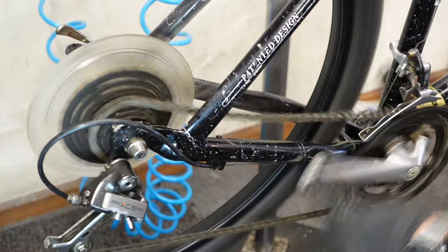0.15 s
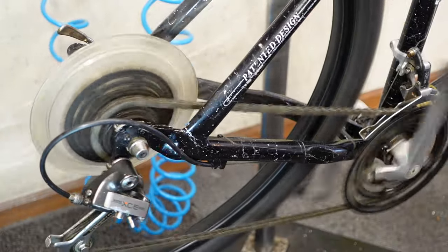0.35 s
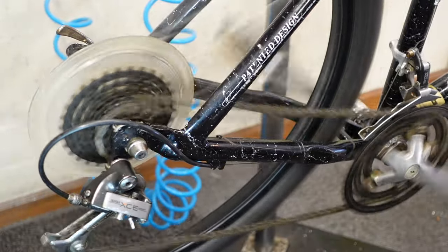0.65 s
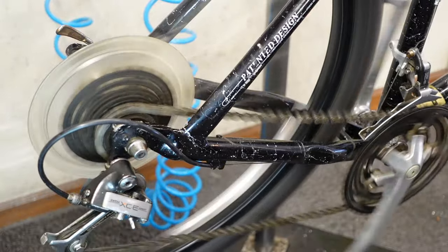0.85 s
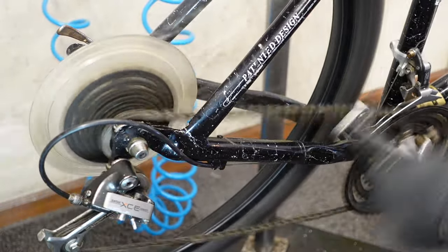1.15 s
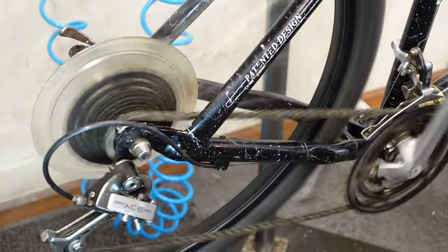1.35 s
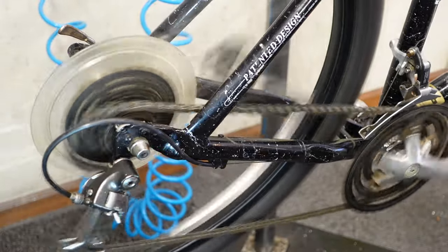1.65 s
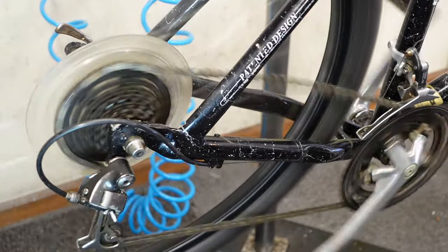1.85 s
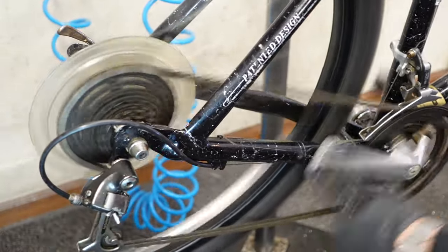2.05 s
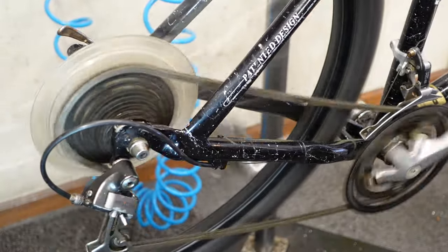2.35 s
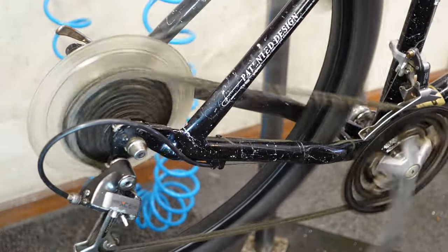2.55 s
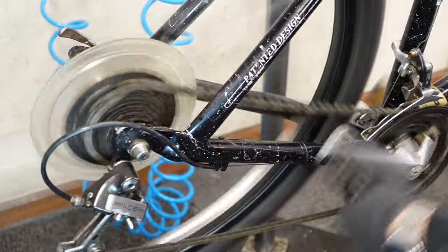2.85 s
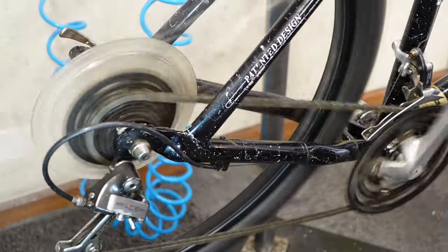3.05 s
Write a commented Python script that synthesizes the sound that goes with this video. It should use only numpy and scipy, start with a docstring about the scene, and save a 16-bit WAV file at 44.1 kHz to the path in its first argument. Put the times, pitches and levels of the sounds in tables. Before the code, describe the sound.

Bicycle gears shifting with sharp metal clanks and ticks over a low wheel rumble.

```python
"""A low rumble and a faint patter, then sharp steel snaps: a bicycle is pedalled by hand on a repair
stand in a small workshop while the rear gears are shifted. The chain snaps over the sprocket teeth,
drops onto new cogs with clanks that shake the frame, then ticks against the next cog. Each impact is
a short noise burst shaped by the resonances of the struck parts, and sets the cogs ringing.
Underneath, the rollers patter, loose links rattle and the wheel rumbles."""
import sys
import numpy as np
from scipy import signal
from scipy.fft import rfft, irfft
from scipy.io import wavfile
from scipy.ndimage import uniform_filter1d

SR = 44100
rng = np.random.default_rng(int(sys.argv[2]) if len(sys.argv) > 2 else 0)


def file_out(sig):
    """Save sig as 16-bit WAV at sys.argv[1]."""
    # one column per channel
    cols = np.atleast_2d(sig).T
    # limit, then scale
    lim = np.clip(cols, -1, 1)
    pcm = np.round(lim * 32767).astype(np.int16)
    wavfile.write(sys.argv[1], SR, pcm)


N = 141120
TIME = np.arange(N) / SR
CUTOFF_HZ = 16000


def from_db(db):
    """Amplitude ratio of a level in decibels."""
    return 10 ** (np.asarray(db) / 20)


def rms_one(x):
    """Normalisation to unit rms."""
    return x / np.sqrt(np.mean(x ** 2) + 1e-20)


def envelope(curve):
    """Gain over time, interpolated between (t/s, level/dB) points."""
    return from_db(np.interp(TIME, *np.transpose(curve)))


def fluctuation(samples):
    """Low-pass noise of unit rms: a moving average of white noise."""
    return rms_one(uniform_filter1d(rng.standard_normal(N), size=samples))


def at_hz(points, hz, axis=1):
    """Interpolation of a table column over log frequency."""
    table = np.array(points)
    return np.interp(np.log(hz + 1e-3), np.log(table[:, 0]), table[:, axis])


def colour(x, spectrum):
    """Minimum-phase filtering at unit power gain; folding the cepstrum makes it causal."""
    size = 2 * N
    gain = rms_one(from_db(at_hz(spectrum, np.arange(N + 1) * SR / size)))
    cepstrum = irfft(np.log(gain))
    cepstrum[1:N] *= 2
    cepstrum[N + 1:] = 0
    return irfft(rfft(x, size) * np.exp(rfft(cepstrum)))[:N]


def resonate(x, modes):
    """Modal superposition: damped two-pole resonators driven by x, summed with alternating signs."""
    out = 0
    for k, (hz, db, t60) in enumerate(modes):
        radius, angle = from_db(-60 / (t60 * SR)), 2 * np.pi * hz / SR
        feedback = [1, -2 * radius * np.cos(angle), radius ** 2]
        out += (-1) ** k * from_db(db) * signal.lfilter([0, np.sin(angle)], feedback, x + 1e-18)
    return out


def driven_mode(s, db, hz, rise_ms, decay_ms):
    """Forced, then free vibration: a mode builds up under the chain's chatter until s, then decays."""
    ms = (TIME - s) * 1000
    shape = np.exp(np.maximum(np.minimum(ms / rise_ms, -ms / decay_ms), -20))
    return from_db(db) * shape * np.sin(2 * np.pi * hz * (TIME - s))


def contact(s, db, rise_ms, decay_ms):
    """Impact noise: dense steel chatter that grows exponentially until s, then decays."""
    ms = (TIME - s) * 1000
    near = (ms > -6 * rise_ms) & (ms < 8 * decay_ms)
    shape = np.exp(np.minimum(ms[near] / rise_ms, -ms[near] / decay_ms))
    chatter = rng.standard_normal(N)[near] * shape
    out = np.zeros(N)
    out[near] = from_db(db) * rms_one(chatter) * np.sqrt(np.mean(shape ** 2))
    return out


SLIDE_LEAD_S, LINK_BANDWIDTH_HZ = 0.000857, 710
def link_click(s, db, decay_ms, hz):
    """Damped resonance: a faint slide on the tooth, then a hard hit, excite a link's broad mode."""
    hit = contact(s + SLIDE_LEAD_S, db, rise_ms=0.26, decay_ms=max(decay_ms, 0.5))
    hit += contact(s, db - 12.5, rise_ms=1.45, decay_ms=1.45)  # the slide
    hz = min(hz, CUTOFF_HZ)
    link_mode = signal.iirpeak(hz, hz / LINK_BANDWIDTH_HZ, fs=SR)
    return hit + from_db(-0.5) * signal.lfilter(*link_mode, hit + 1e-18)


# reverberation of the workshop: f/Hz, T60/s, level/dB
ROOM_DECAY = [(153, 0.82, -9.5), (487, 0.96, 0), (2100, 0.23, -8.5), (5430, 0.11, -2.5), (9100, 0.11, -7.5),
              (15000, 0.083, -5.5)]
def workshop(x, gap_s=0.0013, build_s=0.0007):
    """Diffuse reverberation: the reflections decay exponentially in each band, faster in the treble."""
    t = TIME[:SR // 2]
    edges = np.geomspace(80, 18000, 12)
    white, tail = rng.standard_normal((2, len(t))), 0
    build = 1 - np.exp(-np.maximum(t - gap_s, 0) / build_s)
    for k, band in enumerate(zip(edges, edges[1:])):
        hz = np.sqrt(band[0] * band[1])
        fade = build * from_db(-60 * t / at_hz(ROOM_DECAY, hz))
        noise = signal.sosfilt(signal.butter(2, band, "band", fs=SR, output="sos"), white[k % 2])
        tail += from_db(at_hz(ROOM_DECAY, hz, axis=2)) * noise * fade / np.sqrt(np.sum(fade ** 2))
    return signal.fftconvolve(x, tail)[:N]


# envelope of the running wheel and drive: t/s, level/dB
RUMBLE_LEVEL = [(0, -31), (0.06, -40), (0.35, -41), (0.7, -37), (1.1, -44.5), (1.42, -43.5), (1.85, -31),
                (2.0, -39.5), (2.55, -36), (2.9, -41), (3.2, -47)]
# their spectrum: f/Hz, level/dB
RUMBLE_SPECTRUM = [(20, -21), (35, -15.5), (60, -5.5), (100, -6), (170, -3.5), (300, 2.5), (500, 5),
                   (750, -9), (1200, -5.5), (2500, -16), (6000, -31), (15000, -61)]
def wheel_rumble(flutter_db=0.7):
    """Amplitude-modulated noise: the wheel and drive run with a low, uneven rumble."""
    flutter = from_db(flutter_db * fluctuation(2000))
    return envelope(RUMBLE_LEVEL) * flutter * colour(rng.standard_normal(N), RUMBLE_SPECTRUM)


# modes of a roller seating on a tooth: f/Hz, level/dB, T60/s
SEATING_MODES = [(6560, 2.5, 0.0053), (7100, -7, 0.007), (8270, -0.5, 0.0032)]
# single rollers that seat hard: t/s, level/dB
HARD_SEATINGS = [(0.5263, -18), (0.561, -19.5), (0.6041, -21.5), (0.6392, -21.5), (1.0183, -22.5)]
def rollers(count=170, per_s=49, mean_db=-36, spread_db=4.5):
    """Impulse excitation: the rollers seat in an uneven train, each with a faint high tick."""
    jitter, strength = np.clip(rng.standard_normal((count, 2)), -2, 2).T
    beats = (np.arange(count) + 0.3 * jitter) / per_s
    inside = (beats > 0) & (beats < TIME[-1])
    train = np.zeros(N)
    train[(beats[inside] * SR).astype(int)] = from_db(mean_db + spread_db * strength[inside])
    for s, db in HARD_SEATINGS:
        train[int(s * SR)] = from_db(db)
    return resonate(train, SEATING_MODES)


# envelope of the chain's continuous rattle: t/s, level/dB
RATTLE_LEVEL = [(0, -37.5), (0.15, -44.5), (0.26, -27.5), (0.44, -38.5), (0.72, -43.5), (0.79, -22),
                (0.96, -37), (1.1, -43.5), (1.28, -40), (1.47, -45), (1.49, -31), (1.6, -24.5),
                (1.83, -24.5), (1.99, -36), (2.12, -29.5), (2.62, -34), (2.82, -39), (3.2, -42)]
# its spectrum: f/Hz, level/dB
RATTLE_SPECTRUM = [(150, -5.5), (900, -3.5), (1700, 0), (2700, 3), (4300, -4.5), (7000, -3), (10000, -7),
                   (13500, -12.5), (16000, -23)]
def link_rattle(per_s=350, spread_db=1.5, decay_ms=1.57):
    """Incoherent summation: loose links jostle in tiny random scrapes whose powers add."""
    sizes = from_db(spread_db * np.minimum(rng.exponential(1, N), 4))
    touches = sizes ** 2 * (rng.random(N) < per_s / SR)
    retained = np.exp(-2000 / (decay_ms * SR))  # power decays twice as fast as amplitude
    power = signal.lfilter([1], [1, -retained], touches + 1e-18)
    scrapes = np.sqrt(power) * rng.standard_normal(N)
    return envelope(RATTLE_LEVEL) * rms_one(colour(scrapes, RATTLE_SPECTRUM))


# modes of the sprocket cluster: f/Hz, level/dB, T60/s
SPROCKET_MODES = [(544.3, -55, 0.88), (1632, -51, 0.41), (2120, -60, 0.59), (2520, -63, 0.25),
                  (5560, -57, .3)]
def sprocket_ring(chain):
    """Resonance: the lightly damped cogs ring on after the chain's contacts."""
    return resonate(chain, SPROCKET_MODES)


# envelope of a struck steel part: t/s, rise/ms, decay/ms
STEEL_ENVELOPE = (0.272, 16, 12)
# its modes: f/Hz, level/dB
STEEL_PARTIALS = [(4790, -29), (7390, -19), (10400, -31), (11850, -33)]
def steel_ring():
    """Inharmonic modes: a thin, high ring follows the opening clanks."""
    s, rise, decay = STEEL_ENVELOPE
    return sum(driven_mode(s, db, hz, rise, decay) for hz, db in STEEL_PARTIALS)


# brief pitched chain sounds: t/s, f/Hz, level/dB, Gaussian width/s
CHAIN_TONES = [(0.338, 2910, -20, 0.0052), (1.763, 2900, -14, 0.0031), (2.056, 2700, -13.5, 0.0026),
               (2.881, 2490, -17.5, 0.0018)]
def chain_tones(waver_hz=68):
    """Frequency-modulated tone bursts: three link squeaks, then one short cog ping."""
    out = 0
    for s, hz, db, width in CHAIN_TONES:
        phase = 2 * np.pi * np.cumsum(hz + waver_hz * fluctuation(60)) / SR
        swell = np.exp(-0.5 * ((TIME - s) / width) ** 2)
        out += from_db(db) * swell * np.sin(phase)
    return out


# side plates touching the neighbouring cog: t/s, relative level/dB
PLATE_TICKS = [(2.0287, -6), (2.0996, -10.5), (2.1089, -8), (2.1275, -12.5), (2.147, -11), (2.1637, -10),
               (2.1868, -13.5), (2.2202, -7.5), (2.2369, -12.5), (2.2957, -16.5), (2.3226, -4.5),
               (2.3381, -8.5), (2.389, -7.5), (2.4286, -7), (2.444, -7), (2.463, -8.5), (2.4725, -10),
               (2.5037, -3), (2.5068, -7), (2.5366, -13), (2.5493, -4.5), (2.563, -4.5), (2.5974, -4.5),
               (2.6394, -10.5), (2.6837, -1), (2.716, -8), (2.7623, -12.5), (2.926, -8.5), (2.9442, -14.5),
               (2.963, -17.5), (3.0015, -18.5), (3.02, -8), (3.098, -14), (3.1914, -9.5)]
# their spectrum: f/Hz, level/dB
TICK_SPECTRUM = [(150, -14), (700, -13.5), (1100, -3), (1900, -9.5), (2400, -5), (3100, -4), (4500, -3),
                 (6300, -5), (9500, -4), (13500, -11), (16000, -28)]
def plate_ticks(typical_decay_ms=2.94, typical_hz=7080, gain_db=-7.5):
    """Light impacts: each plate meets the cog with its own decay time and resonant frequency."""
    variation = 2 ** rng.uniform(-0.35, 0.51, (len(PLATE_TICKS), 2))
    clicks = sum(link_click(s, db, typical_decay_ms * longer, typical_hz * higher)
                 for (s, db), (longer, higher) in zip(PLATE_TICKS, variation))
    return from_db(gain_db) * colour(clicks, TICK_SPECTRUM)


# modes of the rubbed cog: f/Hz, level/dB, T60/s
PING_MODES = [(2260, -12.5, 0.017), (2557, -12.5, 0.017), (2730, -20, 0.013)]
def cog_pings(grazes_per_s=30, graze_db=7, strength_exponent=0.63):
    """Impulse response: each tick, and light grazes from the first tick on, ping the cog's modes."""
    s, db = np.transpose(PLATE_TICKS)
    grazed = (rng.random(N) < grazes_per_s / SR) & (TIME > s[0])
    strikes = grazed * from_db(graze_db) * envelope(RATTLE_LEVEL)
    strikes[((s + SLIDE_LEAD_S) * SR).astype(int)] = from_db(db)
    return resonate(strikes ** strength_exponent, PING_MODES)


# pitched knocks of the frame: t/s, level/dB, f/Hz, decay/ms
FRAME_KNOCKS = [(0.236, -25.5, 148, 21), (1.26, -16, 407, 29), (1.337, -16, 415, 11), (1.801, -12, 215, 11),
                (1.836, -18.5, 398, 10), (1.876, -14, 935, 12), (2.645, -29, 224, 8.2)]
def frame_knocks(rise_ms=4):
    """Selective excitation: a hard drop of the chain singles out one mode of the frame."""
    return sum(driven_mode(s, db, hz, rise_ms, decay) for s, db, hz, decay in FRAME_KNOCKS)


# the chain seating on a cog: t/s, clank level/dB, thud level/dB, rise/ms, decay/ms
DROPS = [(0.193, -17.5, -19.5, 3.4, 11), (0.234, -8.5, -21.5, 3.6, 11.4), (0.313, -27, -22.5, 4.5, 24),
         (0.335, -10, -27, 1.8, 2.8), (0.374, -19, -25, 6.3, 4.1), (0.53, -26.5, -32, 1.8, 21.5),
         (0.764, -11, -14.5, 5, 6.5), (0.802, -19, -17.5, 3.6, 12.4), (0.839, -15, -24.5, 9.1, 7),
         (1.005, -38, -30, 4.6, 23), (1.132, -24.5, -18, 2.8, 7.7), (1.215, -23.5, -24.5, 9.3, 5.5),
         (1.252, -12.5, -14, 8.2, 16.5), (1.279, -18, -22, 9.7, 21), (1.337, -17.5, -18.5, 7.5, 9.3),
         (1.72, -27, -23.5, 9.8, 9.6), (1.761, -19, -25.5, 1.7, 28), (1.797, -39, -13.5, 12.4, 11.6),
         (1.817, -9.5, -24, 12, 8.7), (1.875, -15, -14.5, 3.2, 13.7), (1.936, -22, -43, 2.3, 6.7),
         (2.051, -15.5, -23.5, 3, 9.2), (2.204, -20.5, -19, 1.5, 11.4), (2.511, -21, -25, 1.9, 9.9),
         (2.690, -12.5, -23.5, 1.8, 4.3), (2.807, -74, -28, 3.8, 7.5)]
# spectra of the cogs' clank and the frame's thud: f/Hz, level/dB
CLANK_SPECTRUM = [(200, -38), (900, -16), (1500, -12.5), (2100, 1.5), (2900, 0), (3900, -9), (6000, -15),
                  (9500, -15.5), (13500, -27), (16000, -39)]
THUD_SPECTRUM = [(30, -33), (100, -15.5), (155, -4.5), (215, -0.5), (300, -4.5), (405, 0), (560, -1),
                 (720, -4), (930, -2), (1500, -7), (3000, -39), (12000, -47)]
def chain_drops(clatter_db=3):
    """Structure-borne sound: each drop clanks in the cogs, link by link, and thuds through the frame."""
    clank = sum(contact(s, db, rise, decay) for s, db, _, rise, decay in DROPS)
    thud = sum(contact(s, db, rise, decay) for s, _, db, rise, decay in DROPS)
    clatter = rms_one(from_db(clatter_db * np.clip(fluctuation(80), -2, 2)))
    return colour(clank * clatter, CLANK_SPECTRUM), colour(thud, THUD_SPECTRUM)


# links leaving the tooth tips: t/s, relative level/dB, decay/ms, link resonance f/Hz
LINK_SNAPS = [(0.1888, -4.5, 2, 6800), (0.2263, -4.5, 1.6, 8800), (0.2564, -8.5, 2.9, 7350),
              (0.2904, -9.5, 3.4, 9800), (0.303, -14.5, 2.7, 9300), (0.359, -11, 3.7, 10100),
              (0.3725, -2.5, 2.1, 10100), (0.4838, -1.5, 1, 8400), (0.75, -14.5, 5.6, 6840),
              (0.7594, -5.5, 3, 8500), (0.7758, -3.5, 3.5, 9900), (0.7967, -2, 2.3, 8700),
              (0.8229, -5.5, 2.3, 2500), (0.854, -10, 2.6, 2960), (0.8806, -4.5, 2.7, 11100),
              (0.9025, -9.5, 1.8, 5900), (0.9778, -18, 2.1, 3020), (1.1249, -12, 4, 6400),
              (1.168, -13, 2.9, 5500), (1.481, 0, 1.6, 9500), (1.5455, -0.5, 1.34, 6000),
              (1.5793, -1, 1.7, 7700), (1.6167, -1, 1.4, 7900), (1.6536, -1, 1.34, 3400),
              (1.6841, -7, 0.55, 7940), (1.6979, 2.5, 0.47, 7550), (1.7827, -7, 5, 8540),
              (1.7964, -6.5, 4.9, 6640), (1.935, -5, 2.7, 11900), (2.061, -5, 3.7, 10100),
              (2.2017, -3.5, 2.9, 1410), (2.4013, -1.5, 1, 6460), (2.5851, -4.5, 2.8, 3670),
              (2.8791, -11.5, 1.7, 2500)]
# their spectrum: f/Hz, level/dB
SNAP_SPECTRUM = [(150, -20.5), (600, -2), (1300, -11.5), (1800, 2.5), (2400, -2), (3400, 2.5), (4800, -2.5),
                 (8200, 0), (10500, -3), (13500, -6.5), (16000, -28)]
def chain_snaps(gain_db=-4.5):
    """Transient excitation: links snap off the teeth so briefly that the sound is broadband."""
    clicks = sum(link_click(*snap) for snap in LINK_SNAPS)
    return from_db(gain_db) * colour(clicks, SNAP_SPECTRUM)


def scene():
    """Superposition: chain contacts, each group with its own reflections, plus ringing and rumble."""
    parts = [chain_snaps(), plate_ticks() + cog_pings(), *chain_drops(), rollers() + link_rattle()]
    chain = sum(parts)
    reflections = sum(workshop(part) for part in parts)
    tones = sprocket_ring(chain) + chain_tones() + frame_knocks() + steel_ring()
    return (chain + tones + reflections + wheel_rumble())[None]


def record(dry, ceiling=1.28):
    """Soft saturation rounds the loudest peaks; a steep low-pass filter cuts the top."""
    rounded = ceiling * np.tanh(dry / ceiling)
    low_pass = signal.ellip(10, 0.2, 80, CUTOFF_HZ, fs=SR, output="sos")
    return signal.sosfilt(low_pass, rounded, axis=-1)


dry = scene()
out = record(dry)
file_out(out)
```